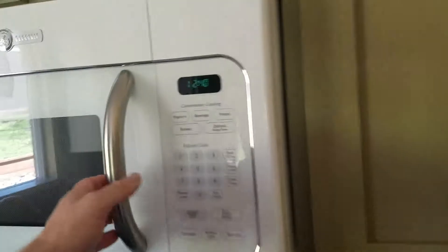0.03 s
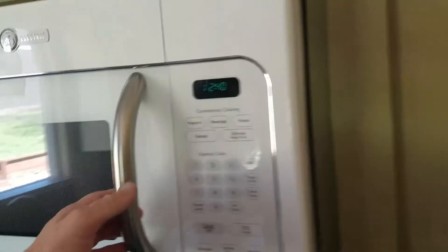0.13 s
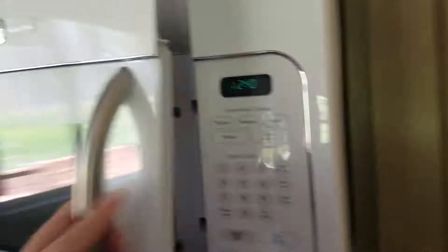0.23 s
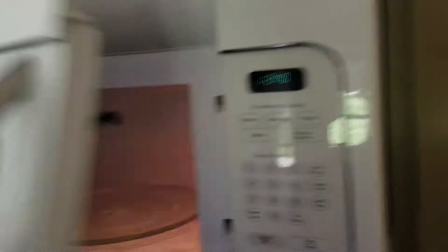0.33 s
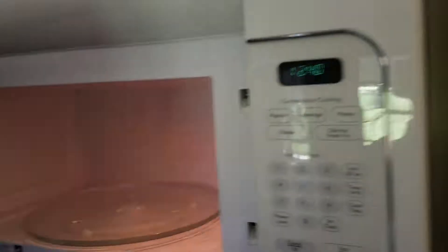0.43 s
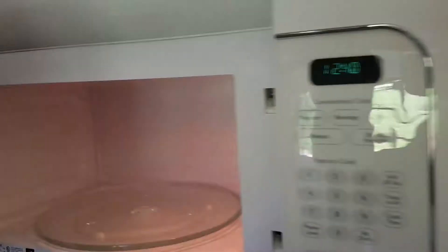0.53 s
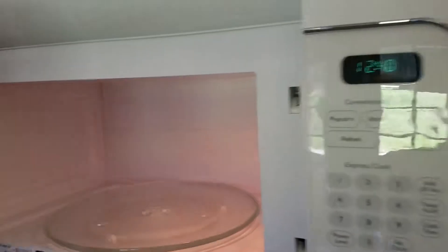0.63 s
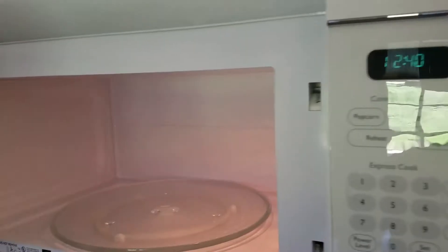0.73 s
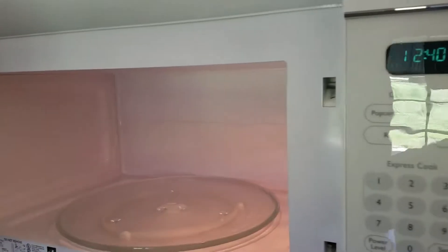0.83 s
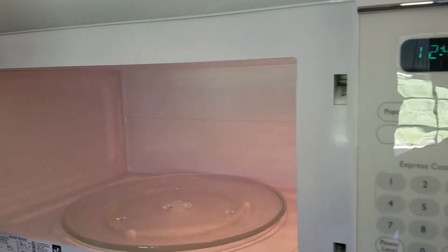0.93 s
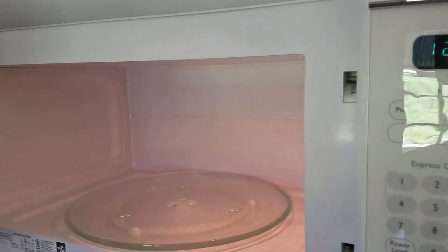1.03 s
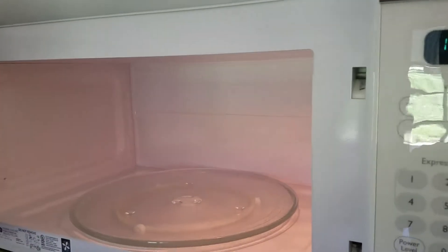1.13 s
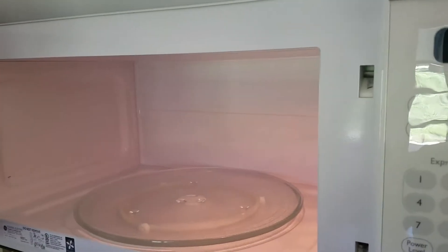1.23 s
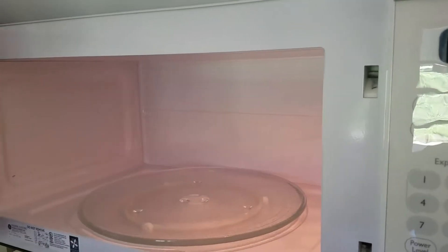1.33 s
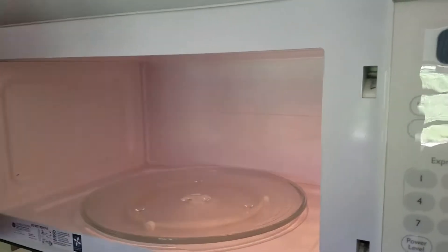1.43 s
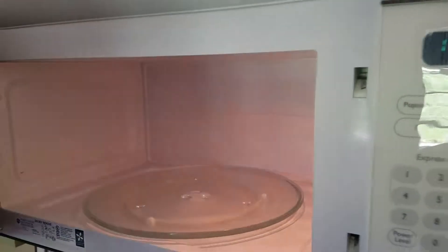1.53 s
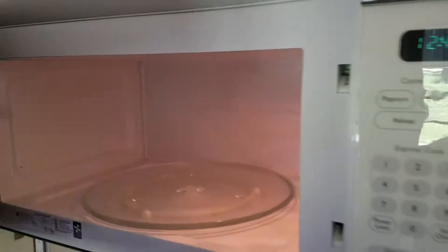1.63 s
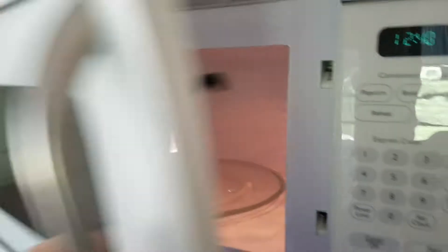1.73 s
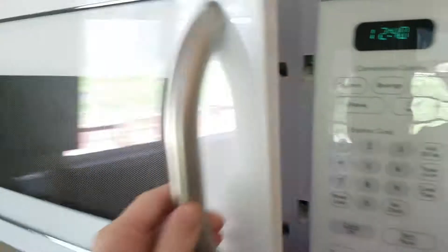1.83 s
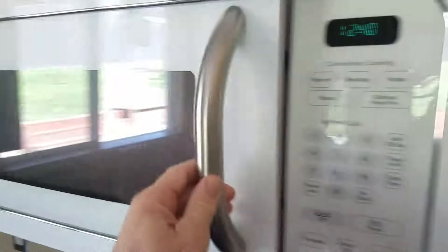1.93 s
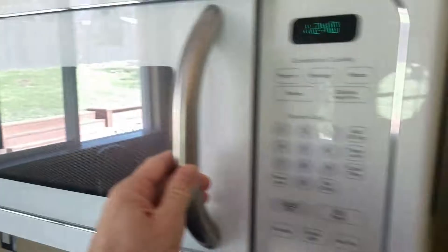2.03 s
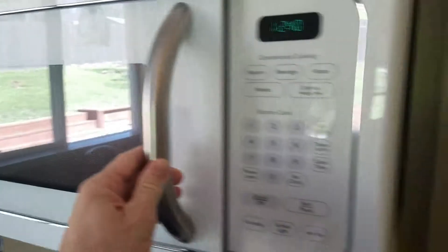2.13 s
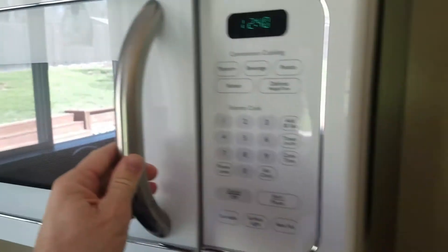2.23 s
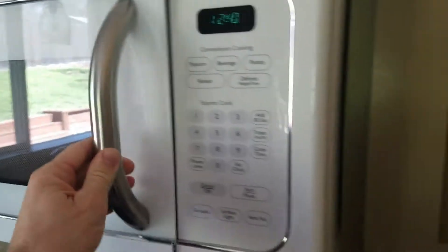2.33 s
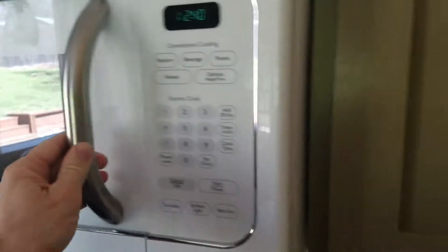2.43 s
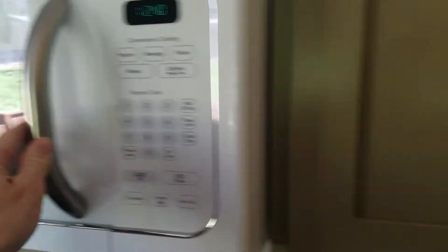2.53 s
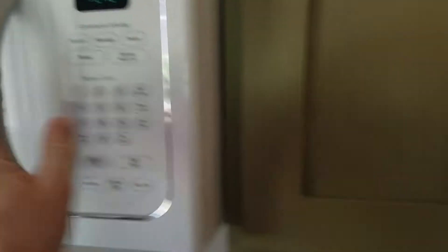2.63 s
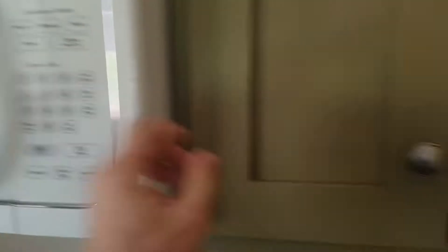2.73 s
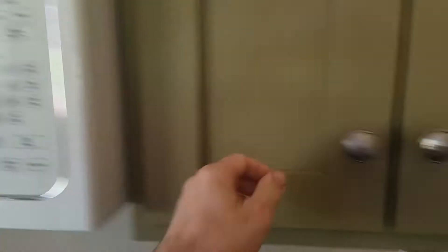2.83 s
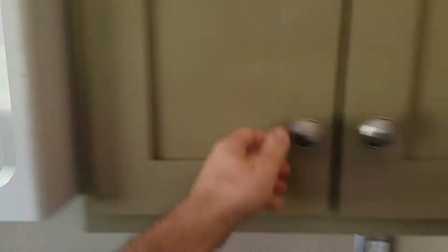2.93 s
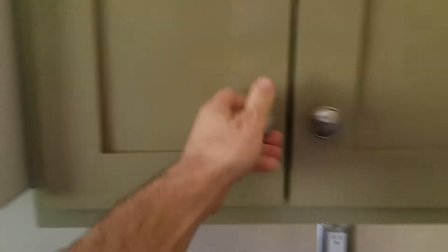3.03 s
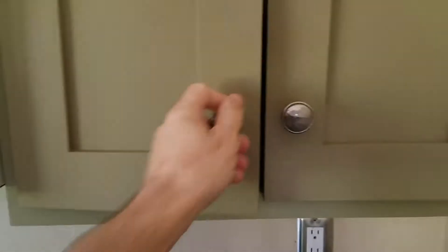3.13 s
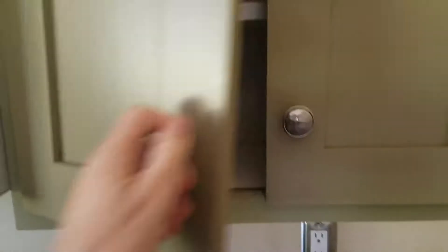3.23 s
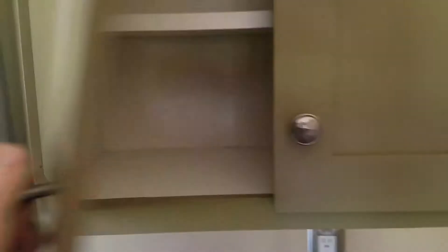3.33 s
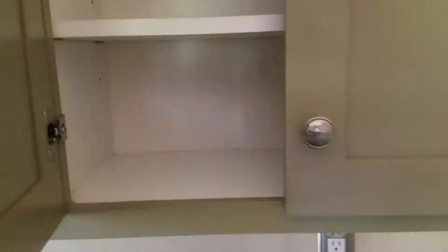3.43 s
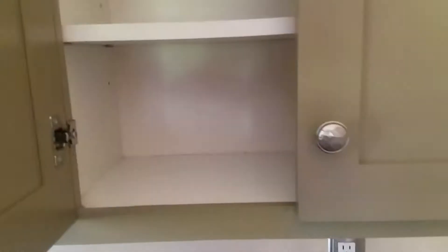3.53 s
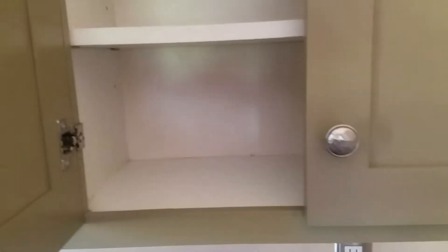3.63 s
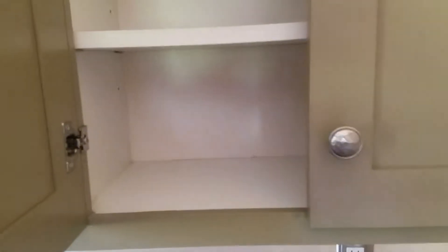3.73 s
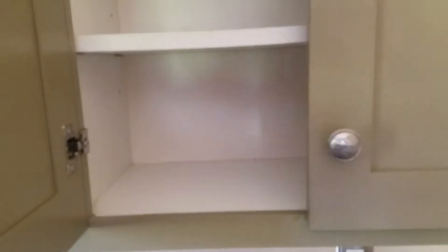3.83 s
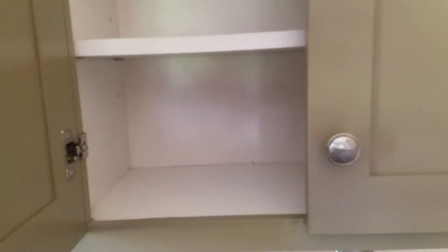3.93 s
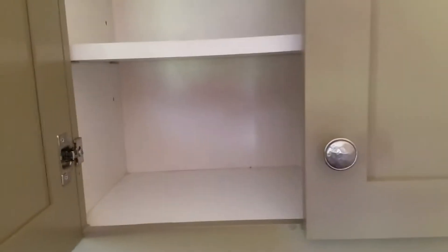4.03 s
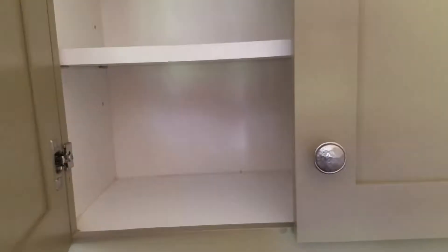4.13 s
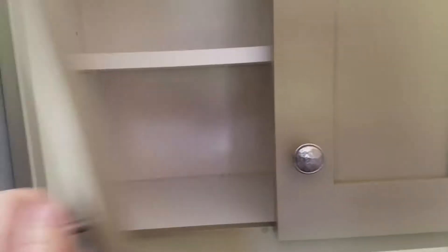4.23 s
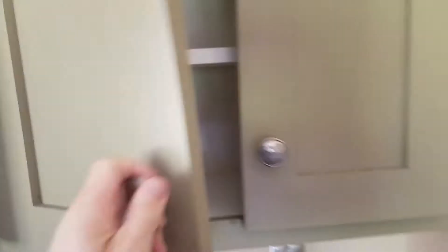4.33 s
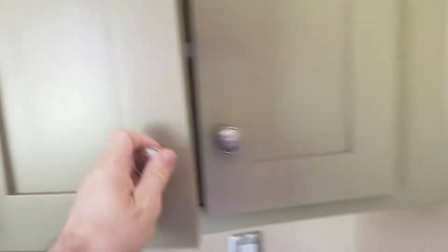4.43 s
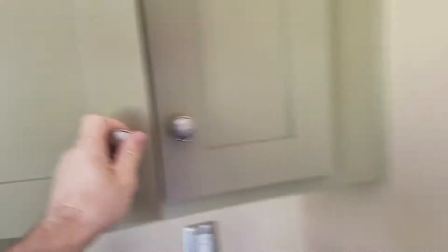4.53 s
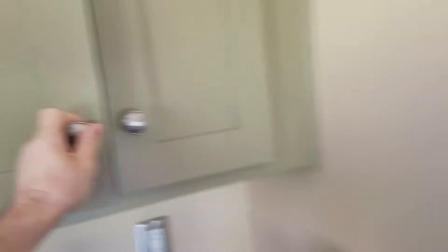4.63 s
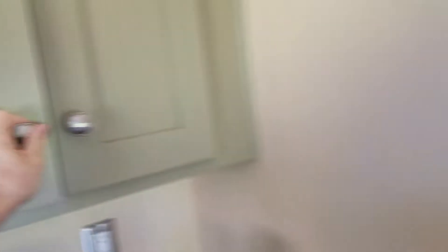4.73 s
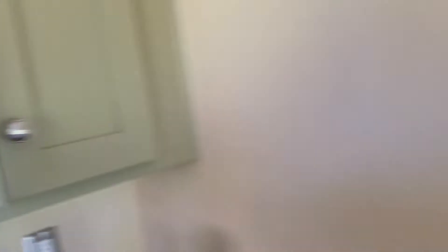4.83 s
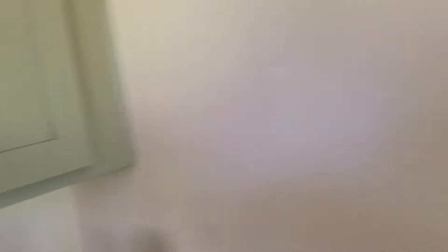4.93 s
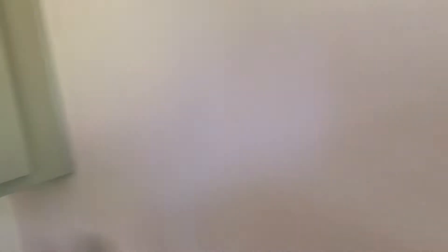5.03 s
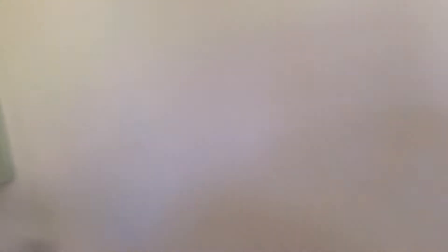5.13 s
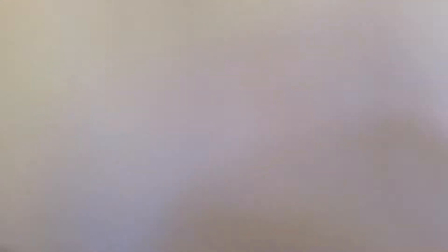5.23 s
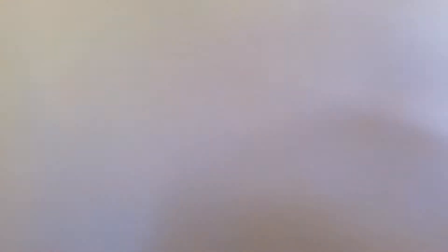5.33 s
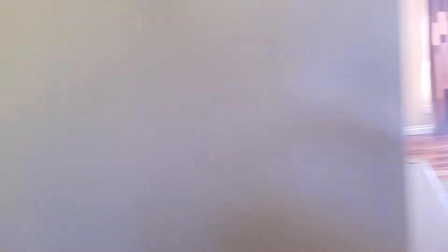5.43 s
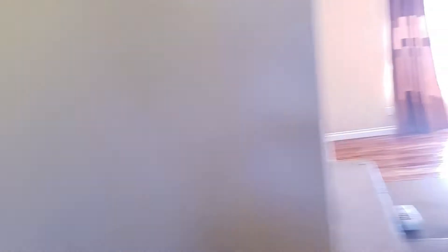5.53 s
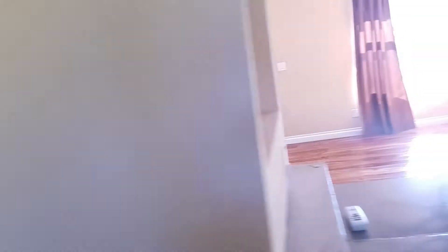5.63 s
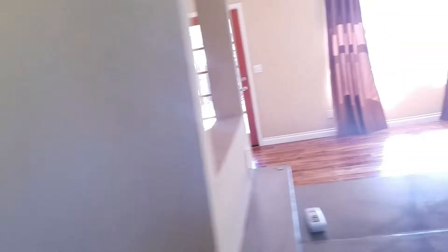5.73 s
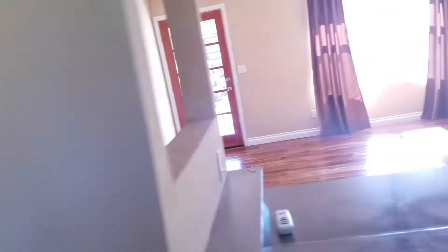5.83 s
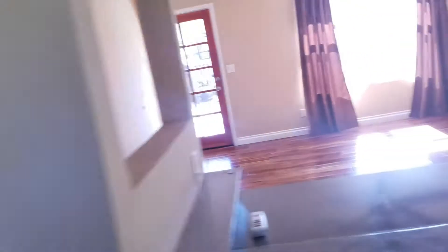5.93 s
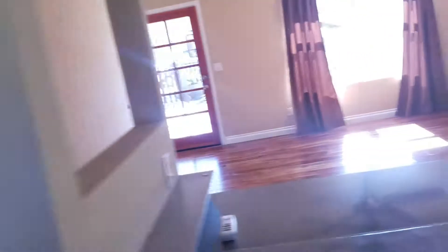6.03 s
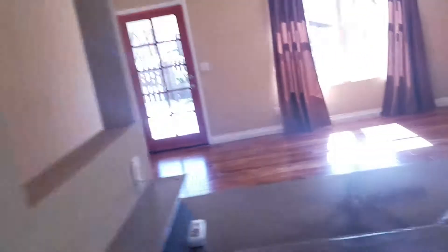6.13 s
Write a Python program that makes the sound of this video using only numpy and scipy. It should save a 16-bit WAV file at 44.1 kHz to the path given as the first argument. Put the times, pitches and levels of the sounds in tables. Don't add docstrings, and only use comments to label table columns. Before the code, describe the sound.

A hand and sleeve rustle, then a microwave latch scrapes and snaps, and the thin metal door springs open, humming on faintly. After a quiet pause the door touches its latch and is driven home with a loud boomy clunk. A wooden cabinet door is handled with dull bumps, then bangs and rattles on its frame. One heel knocks on floorboards. Close stereo handheld microphone, bare reverberant house.

```python
import sys
import numpy as np
from scipy import signal
from scipy.fft import rfft, irfft
from scipy.io import wavfile
from scipy.ndimage import uniform_filter1d

SR = 44100
rng = np.random.default_rng(int(sys.argv[2]) if len(sys.argv) > 2 else 0)


def boost_factor(decibels):
    exponent = np.asarray(decibels, float) / 20
    return 10 ** exponent


def transcribe(u):
    v = np.clip(np.atleast_2d(u).T, -1, 1)
    q = np.round(v * 32767).astype(np.int16)
    wavfile.write(sys.argv[1], SR, q)


N = 272484


def evened(x):
    return x / np.sqrt(np.mean(x ** 2) + 1e-20)


def read(points, hz):
    f, value = np.transpose(points)
    return np.interp(np.log(hz + 1), np.log(f + 1), value)


def colour(x, points):
    hz = np.fft.rfftfreq(x.shape[-1], 1 / SR)
    return irfft(rfft(x) * boost_factor(read(points, hz)), x.shape[-1])


def band(x, lo_hz, hi_hz):
    sos = signal.butter(2, [lo_hz, hi_hz], "bandpass", fs=SR, output="sos")
    return evened(signal.sosfilt(sos, x))


def pair(x, same):
    hz = np.fft.rfftfreq(x.shape[-1], 1 / SR)
    alike = np.clip(read(same, hz), -1, 1)
    a, b = rfft(x)
    return irfft(np.array([a, alike * a + np.sqrt(1 - alike ** 2) * b]), x.shape[-1])


def add(mix, s, sound):
    part = mix[:, round(s * SR):][:, :sound.shape[1]]
    part += sound[:, :part.shape[1]]


def arch(start, length, skew, point=1.68):
    out = np.zeros(N)
    part = out[round(start * SR):][:round(length * SR)]
    swing = np.sin(np.pi * np.linspace(0, 1, round(length * SR)) ** skew).clip(0)
    part += (swing ** point)[:len(part)]
    return out


# (frequency [Hz], level [dB per Hz])
FLOOR_COLOUR = [(12, -30.5), (20, 5), (48, -7.5), (85, -29), (130, -17), (178, -23.5), (243, -12),
                (296, -18.5), (460, -16), (961, -22.5), (1780, -21.5), (7050, -42), (13500, -32.5),
                (15900, -27)]
# (frequency [Hz], likeness [-1 to 1])
FLOOR_SAME = [(60, -1.6), (180, -0.45), (550, 0.37), (1650, -0.2), (4970, 0.28), (15000, -0.5)]


def floor():
    drift = boost_factor(1.0 * evened(uniform_filter1d(rng.standard_normal(N), 8000)))
    hiss = pair(rng.standard_normal((2, N)), FLOOR_SAME)
    return boost_factor(-63.5) * drift * evened(colour(hiss, FLOOR_COLOUR))


# (frequency [Hz], time to fall 60 dB [s])
ROOM_T60 = [(60, 0.27), (150, 0.68), (340, 0.59), (700, 0.78), (1400, 1), (2000, 0.96), (2900, 0.85),
            (5400, 0.81), (10000, 0.3), (14500, .55)]
# (frequency [Hz], level [dB])
ROOM_LEVEL = [(60, -4.5), (200, .5), (380, -2), (600, -4.5), (1200, -8), (2100, -7), (3200, -9.5),
              (5500, -10), (10000, -9)]
# (frequency [Hz], likeness [-1 to 1])
ROOM_SAME = [(60, 0.92), (180, 0.97), (550, 0.69), (1650, -0.22), (4970, 0.094), (15000, -0.5)]


def room(x):
    hz, t, z = signal.stft(rng.standard_normal((4, SR + SR // 4)), SR, nperseg=256)
    fading = z * boost_factor(-60 * t / read(ROOM_T60, hz)[:, None])
    tail = signal.istft(fading, SR, nperseg=256)[1]
    tail = tail * (1 - np.exp(-np.arange(tail.shape[1]) / (0.00028 * SR))) ** 2
    tail = tail / np.linalg.norm(tail[0])
    bass = signal.sosfilt(signal.butter(2, 600, fs=SR, output="sos"), x[0])
    turn = np.cumsum(0.15 * rng.standard_normal(N))
    wandering = (x[0] - bass) * np.array([np.cos(turn), np.sin(turn)])
    blurred = colour(wandering, [(150, -30), (400, 0)])
    paths = bass + blurred[0], blurred[1]
    tails = [colour(pair(half, ROOM_SAME), ROOM_LEVEL)[:, :SR] for half in (tail[:2], tail[2:])]
    return sum(signal.fftconvolve(path[None], half, axes=1)[:, :N] for path, half in zip(paths, tails))


# (start [s], length [s], rustle level [dB], panel rumble level [dB])
MOVES = [(0.0, 0.079, -63, -54), (0.032, 0.55, -63, -52), (0.462, 0.28, -68, -56.5),
         (0.61, 0.74, -73, -66.5), (1.109, 0.75, -98, -71), (1.532, 0.1, -72, -87.5),
         (1.6, 0.93, -73, -70.5), (1.872, 0.045, -55, -68), (1.923, 0.097, -63, -74),
         (2.106, 0.087, -78, -52), (2.22, 0.12, -76, -47), (2.646, 0.42, -59, -48.5),
         (2.968, 0.15, -66, -56), (3.067, 0.11, -58.5, -37), (3.207, 0.18, -64.5, -64),
         (3.319, 0.14, -68, -49.5), (3.385, 0.24, -67, -67), (3.646, 0.13, -75, -69),
         (3.74, 0.47, -95, -70.5), (4.083, 0.34, -71.5, -60.5), (4.245, 0.28, -58.5, -71),
         (4.415, 0.19, -62, -63.5), (4.561, 0.29, -61, -56), (4.813, 0.26, -72, -58.5),
         (5.664, 0.19, -66.5, -89), (5.777, 0.25, -70.5, -92), (5.934, 0.33, -63.5, -76)]
# (frequency [Hz], level [dB per Hz])
RUSTLE = [(180, -22.5), (300, -8), (326, -8.5), (360, -4), (1360, -2.5), (1460, -4.5), (3400, -9.5),
          (5080, -18), (14500, -21.5), (16000, -16.5)]
# (frequency [Hz], level [dB per Hz])
RUMBLE = [(18, -37), (30, 3), (75, 9), (165, 0), (253, 0.5), (284, -13.5), (339, -7), (500, -23),
          (650, -28), (1100, -120)]
# (time [s], left-right level [dB])
PANEL_SIDE = [(0, -2.5), (1.5, -2), (3, -2.5), (3.6, -4), (4.101, -4), (4.5, 7.5), (5, 10.5), (5.3, -1),
              (6.2, -6)]


def rough_grains():
    return rng.standard_normal((2, N)) * boost_factor(2.0 * rng.exponential(1, (2, N)))


def moves():
    lumps = boost_factor(3.0 * evened(uniform_filter1d(rng.standard_normal(N), 900)))
    rumble = evened(colour(rng.standard_normal(N), RUMBLE) * lumps)
    effort = np.zeros((2, N))
    for s, length, rustle_db, rumble_db in MOVES:
        effort += arch(s, length, 0.64) * boost_factor([[rustle_db], [rumble_db]])
    sleeve_side = boost_factor([[-2.5], [2.5]])
    rustle = effort[0] * sleeve_side * evened(colour(rough_grains(), RUSTLE))
    side_db = np.interp(np.arange(N) / SR, *np.transpose(PANEL_SIDE)) / 2
    return rustle + effort[1] * rumble * boost_factor([side_db, -side_db])


def hinge_hiss():
    centre_hz, width_hz = 4770, 1100
    hiss = band(rough_grains(), centre_hz - width_hz / 2, centre_hz + width_hz / 2)
    return hiss * boost_factor(-76) * arch(3.17, 0.55, 0.83)


# (start [s], length [s], level [dB], from [Hz], to [Hz])
SQUEAKS = [
    (3.254, .07, -79, 10400, 11200),
    (3.428, 0.065, -76, 10650, 11250),
    (6.083, 0.11, -73, 9900, 11000),
    (6.134, 0.059, -69, 10640, 10900),
]


def squeak():
    waver_hz = 90 * evened(uniform_filter1d(rng.standard_normal(N), 120))
    out = np.zeros(N)
    for start, length, db, from_hz, to_hz in SQUEAKS:
        climb = 1 - np.exp(-np.maximum(np.arange(N) / SR - start, 0) / 0.02)
        pitch_hz = from_hz + (to_hz - from_hz) * climb + waver_hz
        out += boost_factor(db) * arch(start, length, 0.9) * np.sin(2 * np.pi * np.cumsum(pitch_hz) / SR)
    return out * boost_factor([[1.5], [-1.5]])


CREAK = 3.255, 0.052, 680, [-60, -65, -64, -70, -71]


def creak():
    start, length, slip_hz, levels = CREAK
    turns = 2 * np.pi * slip_hz * np.arange(N) / SR
    stack = sum(boost_factor(db) * np.sin((k + 1) * turns) for k, db in enumerate(levels))
    return arch(start, length, 0.66) * stack


HUM_HZ = 242, 336, 672, 1065, 1203
# (level [dB], time to fall 60 dB [s])
HUM = [(-42.5, 1.9), (-44.5, 4.85), (-31.5, 1.1), (-45.5, 0.94), (-49.5, .8)]
# (time [s], frequency [Hz], level [dB], time to fall 60 dB [s])
SHUT_HUM = [
    (2.45, 241.2, -49, 3.28),
    (2.45, 338, -53.5, 3.6),
]


def hum():
    start_s, end_s = 0.18, 2.2
    t = np.arange(end_s * SR - start_s * SR) / SR
    ring = sum(boost_factor(db - 60 * t / t60) * np.sin(2 * np.pi * hz * t) for hz, (db, t60) in zip(HUM_HZ, HUM))
    ring *= 1 + 0.2 * np.sin(2 * np.pi * 4 * t) * np.sin(2 * np.pi * 1.3 * t)
    stilled = signal.windows.tukey(len(t), 0.05) * np.minimum((t[-1] - t) / 0.8, 1)
    out = np.zeros((2, N))
    add(out, start_s, ring * stilled * boost_factor([[-1.5], [1.5]]))
    for s, hz, db, t60 in SHUT_HUM:
        tone = boost_factor(db - 60 * t / t60) * np.sin(2 * np.pi * hz * t)
        add(out, s, tone[None] * signal.windows.tukey(len(t), 0.3))
    return out


# (time [s], peak level [dB], time to fall 60 dB [s],
# brightness [dB per octave], left-right level [dB])
CLICKS = [(0.145, -37.5, .12, 10, 0), (0.165, -33, 0.053, 2, -9), (0.1966, -27.5, 0.038, -1, 2),
          (0.2151, -26.5, 0.12, 0.5, -10), (0.4483, -46.5, 0.086, 1, -1), (0.81, -60.5, 0.043, 3, -5),
          (1.7547, -59, 0.024, -1.5, 2), (1.779, -55, 0.091, -2.5, -9), (1.8204, -54.5, 0.072, -2.5, -4.5),
          (1.876, -37.5, 0.031, 6.5, -12), (1.943, -49.5, 0.071, -2.5, -8.5),
          (2.4169, -19.5, 0.054, 3.5, -3.5), (2.3834, -26, 0.12, 0, -2.5), (2.71, -41.5, 0.032, 3, -2),
          (3.0858, -41.5, 0.054, 2.5, -6), (5.1119, -28.5, 0.061, -1, 10), (5.229, -32, 0.046, -3.5, 8.5),
          (5.388, -66, .03, -3, -5), (6.055, -43.5, 0.023, -6.5, 3.5)]
# (frequency [Hz], level [dB per Hz])
CLICK_COLOUR = [(410, -31), (700, -2.5), (1210, -3), (2630, -5.5), (3890, 0), (4210, -12), (5840, -9.5),
                (7890, -19), (11200, -12), (15000, -19.5), (16000, -11.5)]


def clicks():
    out, t = np.zeros((2, N)), np.arange(4096) / SR
    for s, db, t60, tilt, pan_db in CLICKS:
        tilted = [(hz, level + tilt * np.log2(hz / 4000)) for hz, level in CLICK_COLOUR]
        snap = evened(colour(rng.standard_normal((2, len(t))), tilted))
        snap *= boost_factor(db - 60 * t / max(t60, 0.01)) * (1 - np.exp(-t / 0.0007))
        add(out, s, snap * boost_factor([[pan_db / 2], [-pan_db / 2]]))
    return out


# (time [s], frequency [Hz], level [dB], time to fall 60 dB [s], rise [s])
RINGS = [(.162, 340, -23, .5, .02), (0.21, 290, -29.5, .3, 0.0087), (.32, 1600, -33, .12, .004),
         (.3, 680, -33, 0.42, 0.011), (.232, 794.6, -21.5, 0.16, .002), (.232, 1270, -19, 0.17, .002),
         (0.23, 1590, -23, 0.12, 0.0022), (0.23, 1770, -26, 0.073, .002), (0.24, 239.6, -26, 0.2, 0.0037),
         (0.54, 990, -40, 0.18, .004), (1.945, 719, -56, 0.064, .002), (2.004, 4280, -41.5, 0.15, .002),
         (2.004, 2215, -41, 0.31, .002), (2.0506, 299, -36, 0.42, .01), (2.44, 1280, -24, 0.17, .002),
         (2.44, 889, -28, 0.17, .002), (2.423, 388, -4.5, .13, .008), (2.412, 103, -14.5, .3, 0.0035),
         (2.55, 410, -26, 0.23, .006), (2.575, 1180, -29.5, .1, .004), (2.54, 890, -30, .15, 0.0035),
         (2.42, 580, -21, 0.14, .003), (2.418, 1070, -24.5, 0.11, .002), (2.48, 320, -16, .12, .004),
         (2.485, 430, -15, .13, 0.0073), (2.525, 324, -24.5, 0.099, .004), (3.095, 615, -52, .1, 0.0039),
         (3.1052, 229.6, -37, 0.125, 0.0044), (4.931, 290, -58, 0.36, .03),
         (5.1008, 335.3, -18, 0.056, 0.0022), (5.1126, 369.4, -17, 0.085, .002),
         (5.1186, 1147, -22, 0.059, 0.0015), (5.14, 629, -23.5, 0.17, 0.0037),
         (5.215, 398, -28, 0.074, .004), (5.34, 401, -27, 0.073, .003), (5.28, 95, -29.5, 0.37, .02),
         (5.43, 400, -30.5, .2, .006), (2.5, 96, -38, 0.46, .02), (4.95, 160, -52, 0.41, .03),
         (1.55, 700, -62, .5, .03)]


def rings():
    out, t = np.zeros((2, N)), np.arange(SR // 2) / SR
    for s, hz, db, t60, rise_s in RINGS:
        swell = 1 - np.exp(-t / max(rise_s, 0.0005))
        tone = boost_factor(db - 60 * t / max(t60, 0.01)) * swell * np.sin(2 * np.pi * hz * t)
        add(out, s, tone[None])
    return out


# (frequency [Hz], likeness [-1 to 1])
NEAR_SAME = [(400, .9), (1000, .15), (3000, 0), (8000, .1), (15000, -.3)]


def blows(hits, body, panel, spread, rise_s, clack_share, tick_share, lead_s, edge_db, dull_db_per_s):
    out = np.zeros((2, N))
    t = np.arange(16384) / SR
    for s, clack_db, thud_db, t60, centre_hz in hits:
        t60 = max(t60, 0.01)
        tick_db = clack_db + edge_db - min(dull_db_per_s * (s - hits[0][0]), 25.5)
        hz, mode_db = np.transpose(panel + [(centre_hz, 0)])[..., None]
        chance = rng.standard_normal((2, len(hz), 1))
        size = boost_factor(mode_db - spread * abs(np.log2(hz / centre_hz)) + 3.5 * chance[0])
        modes = size * np.sin(2 * np.pi * hz * t + 0.1 * chance[1])
        thud = modes.sum(0) / np.linalg.norm(size)
        thud *= 2 * boost_factor(thud_db - 60 * t / t60) * (1 - np.exp(-t / rise_s))
        add(out, s - lead_s, thud[None])
        crowd = colour(pair(rng.standard_normal((2, len(t))), NEAR_SAME), body)
        clack = boost_factor(clack_db - 60 * t / (clack_share * t60)) * band(crowd, 650, 3600)
        tick = boost_factor(tick_db - 60 * t / (tick_share * t60)) * band(crowd, 3000, 16500)
        add(out, s, (clack + tick) * (1 - np.exp(-t / 0.00032)))
    return out


# (time [s], clack level [dB], thud level [dB], time to fall 60 dB [s], thud centre [Hz])
STEP_HITS = [
    (6.049, -29, -23, 0.021, 624),
    (6.0545, -27.5, -23.5, 0.018, 690),
    (6.063, -36, -34, 0.021, 608),
    (6.075, -49, -34.5, 0.062, 417),
    (6.096, -40, -37, .07, 447),
]
# (frequency [Hz], level [dB per Hz])
BOARDS = [(88, -47.5), (150, -37.5), (264, -13), (545, 14.5), (941, -7), (1340, -36), (1870, 0.5),
          (2550, -14), (2810, -10.5), (7040, -37), (16000, -75)]
# (frequency [Hz], level [dB])
BOARD_PANEL = [(390, -1.5), (563, -3), (760, -3.5), (900, -15.5)]


def heel():
    step = blows(STEP_HITS, BOARDS, BOARD_PANEL, spread=3.0, rise_s=0.00073, clack_share=0.376,
                 tick_share=0.85, lead_s=0, edge_db=-4.5, dull_db_per_s=2199)
    return signal.sosfilt(signal.butter(3, 230, "highpass", fs=SR, output="sos"), step)


# (time [s], clack level [dB], thud level [dB], time to fall 60 dB [s], thud centre [Hz])
DOOR_HITS = [(2.99, -60, -47.5, 0.38, 129), (3.04, -55, -40.5, 0.11, 151), (3.091, -59, -29.5, 0.048, 115),
             (3.103, -74, -31.5, 0.07, 244), (3.149, -72, -61, 0.052, 239), (3.262, -57, -59, 0.14, 268),
             (3.342, -55, -36.5, 0.072, 100.8), (3.438, -59, -48, 0.1, 75), (3.497, -61, -58, 0.069, 73.4),
             (4.12, -66, -53.5, 0.087, 94.6), (4.175, -62, -45.5, 0.099, 167),
             (4.393, -62, -50, 0.095, 112.7), (4.547, -65, -52.5, 0.1, 114),
             (4.582, -56.5, -60.5, 0.41, 118.4), (4.629, -53, -63, 0.075, 164),
             (4.679, -58, -76, 0.065, 94.7), (4.81, -56, -56, 0.053, 97.5), (4.959, -76, -58, 0.079, 105)]
# (time [s], clack level [dB], thud level [dB], time to fall 60 dB [s], thud centre [Hz])
SLAM_HITS = [(5.1005, -36, -28, 0.035, 400), (5.104, -27.5, -8.5, 0.024, 341),
             (5.108, -27.5, -16.5, 0.075, 396.5), (5.111, -16, -12.5, 0.081, 340.3),
             (5.124, -28, -28.5, 0.37, 83.5), (5.15, -47, -23, 0.089, 399.7), (5.186, -59, -31, 0.073, 164),
             (5.23, -27.5, -26, 0.23, 386.2), (5.319, -31.5, -24.5, 0.074, 404),
             (5.346, -34, -18.5, 0.05, 344), (5.39, -34, -31.5, 0.16, 359), (5.44, -40.5, -40.5, 0.24, 125),
             (5.49, -39.5, -33.5, 0.093, 153), (5.52, -43, -34, 0.13, 312), (5.599, -48, -44.5, 0.13, 376)]
# (frequency [Hz], level [dB per Hz])
DOOR = [(180, -33), (300, -37), (354, 4.5), (528, -10), (624, -13), (762, -12.5), (1140, -10), (1610, -17),
        (2100, -19), (10000, -41.5), (16000, -53)]
# (frequency [Hz], level [dB])
HELD_PANEL = [(74, -9), (98, -10), (150, -2), (226, -4), (283, -9.5), (361, -23), (400, -32), (511, -26),
              (604, -22.5)]
# (frequency [Hz], level [dB])
DOOR_PANEL = [(74, -11), (98, -6), (150, -4.5), (226, -2.5), (283, -6), (361, -10), (400, -14.5),
              (511, -16.5), (630, -16.5)]


def cabinet():
    door = dict(spread=4.1, rise_s=0.0027, clack_share=1.0, tick_share=0.43, lead_s=0.003155)
    handled = blows(DOOR_HITS, DOOR, HELD_PANEL, edge_db=-5.5, dull_db_per_s=4.0, **door)
    slam = blows(SLAM_HITS, DOOR, DOOR_PANEL, edge_db=-3.0, dull_db_per_s=78, **door)
    return handled + slam


# (start [s], length [s], final scrape [dB], final groan [dB],
# swell [dB], extra edge [dB])
DRAGS = [
    (0.14, 0.087, -33, -42, 12, 1),
    (2.295, 0.037, -52.5, -51, 5.5, -10),
    (2.312, .072, -39.5, -36, 8, -10.5),
    (2.325, .06, -50.5, -60, 14, 6.5),
    (2.384, 0.031, -24.5, -32.5, -4.5, 3.5),
    (1.7, 0.11, -68, -63, 1.5, -1),
    (2.15, .14, -46.5, -59, 3, -13),
    (4.945, 0.12, -80, -69, 6, 2),
    (4.585, 0.11, -68, -76, -2.5, -1),
]
# (frequency [Hz], level [dB per Hz])
OVEN = [(180, -53), (300, -4), (405, -1), (528, -12.5), (774, -11.5), (978, -17.5), (1120, -8.5),
        (1320, -11), (4300, -22), (14700, -47), (16000, -43)]


def drags():
    slips = rng.standard_normal((2, N)) * boost_factor(2.2 * rng.exponential(1, N))
    body = colour(slips, OVEN)
    scrape, bright = band(body, 550, 3300), band(body, 5300, 18000)
    groan = band(band(slips[0], 200, 510), 200, 510)
    out = np.zeros((2, N))
    for s, length, scrape_db, groan_db, swell_db, edge_db in DRAGS:
        at = np.arange(round(s * SR), round((s + length) * SR))
        to_go = np.linspace(1, 0, len(at))
        fade = signal.windows.tukey(len(at), min(0.0044 * SR / len(at), 1))
        push_db = scrape_db - swell_db * to_go
        bright_db = -35.5 + edge_db + 0.85 * (push_db + 21.5)
        out[:, at] += fade * boost_factor(push_db) * scrape[:, at]
        out[:, at] += fade * boost_factor(bright_db) * bright[:, at]
        out[:, at] += fade * boost_factor(groan_db - 2 * swell_db * to_go) * groan[at]
    return out


# (time [s], clack level [dB], thud level [dB], time to fall 60 dB [s], thud centre [Hz])
OPEN_HITS = [
    (.165, -39.5, -36.5, 0.74, 352),
    (.215, -27.5, -35, 0.26, 201),
    (.2315, -14.5, -32.5, 0.24, 168),
    (.249, -14.5, -21, 0.1, 248),
    (.265, -26.5, -26.5, 0.059, 320),
    (.279, -29.5, -25.5, 0.08, 312),
]
KNOCK_HITS = [
    (.639, -59, -44, 0.085, 338),
    (1.366, -63, -52.5, 0.056, 704),
    (1.385, -73, -53, 0.066, 482),
    (1.595, -57.5, -56, 0.2, 341.6),
    (1.65, -65.5, -62, 0.1, 319.8),
    (1.71, -60.5, -68.5, 0.08, 413.3),
]
PING = [
    (1.132, -92, -61.5, 0.072, 2210),
]
TOUCH_HITS = [
    (2.002, -24.5, -30.5, 0.15, 218),
    (2.024, -21, -20.5, 0.03, 140),
    (2.039, -25, -21, 0.065, 290),
    (2.082, -36, -24, 0.063, 108),
    (2.17, -47, -36.5, 0.062, 200),
]
OVEN_HITS = [
    (2.384, -25, -39, 0.073, 598.4),
    (2.4165, -11.5, -7.5, 0.042, 225.2),
    (2.4225, -11.5, -11, 0.057, 605.4),
    (2.43, -15, -19.5, 0.092, 300.4),
    (2.445, -17.5, -17, 0.16, 102.1),
    (2.474, -23, -14, 0.086, 300),
    (2.497, -28, -19, 0.071, 384.3),
    (2.527, -30, -21.5, 0.047, 308),
    (2.58, -36, -34, 0.041, 387.6),
]
# (frequency [Hz], level [dB per Hz])
OPEN = [(180, -23), (300, -17), (455, -12.5), (1230, -4.5), (1360, -15), (1600, -5), (2100, -12.5),
        (2840, -19.5), (5900, -5.5), (7320, -17.5), (14700, -18.5), (16000, -35)]
# (frequency [Hz], level [dB per Hz])
TOUCH = [(180, -32.5), (300, -7.5), (418, -18), (565, -13.5), (1320, -18), (1640, -25.5), (2200, -17),
         (2800, -35), (3600, -31.5), (4300, -28), (6200, -46), (16000, -49.5)]
# (frequency [Hz], level [dB])
OVEN_PANEL = [(72, -5), (102, 4.5), (140, -7), (214, 1), (312, -4.5), (355, -3), (393, -9.5), (585, -8),
              (802, -2.5), (890, -4), (1130, -0.5), (1470, -9)]


def oven():
    metal = dict(spread=7.06, rise_s=0.0034, clack_share=0.75, tick_share=0.9, lead_s=0.002)
    out = blows(OPEN_HITS, OPEN, OVEN_PANEL, edge_db=1.0, dull_db_per_s=128.5, **metal)
    out += blows(KNOCK_HITS, OPEN, OVEN_PANEL, edge_db=-11.5, dull_db_per_s=-4.5, **metal)
    out += blows(PING, OPEN, [(2050, 3), (2400, -1)], edge_db=0, dull_db_per_s=0, **metal)
    out += blows(TOUCH_HITS, TOUCH, OVEN_PANEL, edge_db=-5.0, dull_db_per_s=910.0, **metal)
    out += blows(OVEN_HITS, OVEN, OVEN_PANEL, edge_db=-2.5, dull_db_per_s=119.5, **metal)
    return out


# (frequency [Hz], left-right level [dB])
PORTS = [(60, -1.5), (150, -4), (380, -0.5), (950, -5), (2380, -8.5), (5980, -5.5), (15000, 1)]
# (frequency [Hz], level [dB])
CAPSULE = [(5000, -1), (6500, -1.5), (7800, -4.5), (10000, 5), (12500, -4), (15000, -0.5), (16000, 1)]


def microphone(x):
    half = np.array(PORTS) * [1, 0.5]
    sides = np.array([colour(x[0], half), colour(x[1], half * [1, -1])])
    return colour(sides, CAPSULE)


def scene():
    hits = oven() + cabinet() + drags()
    tones = rings() + creak()
    snaps = clicks()
    step = heel()
    far = colour(step, [(300, 0.5), (600, -6.0), (1500, 15.5), (4000, 8.0)])
    ringing = room(hits + boost_factor(-7) * tones + far + boost_factor(6.5) * snaps)
    near = microphone(hits + tones + step + ringing)
    return near + snaps + hum() + moves() + hinge_hiss() + floor() + squeak()


def band_limit(x):
    return signal.sosfilt(signal.butter(12, 16510, fs=SR, output="sos"), x)


def record(dry):
    x = signal.sosfilt(signal.butter(3, 58, "highpass", fs=SR, output="sos"), dry)
    x = 1.05 * np.tanh(x / 0.91)
    x = colour(x, [(15850, 0), (16050, -6), (16250, -26), (16450, -40), (16550, -80)])
    mix = x - 0.0005
    return band_limit(mix)


dry = scene()
out = record(dry)
transcribe(out)
```